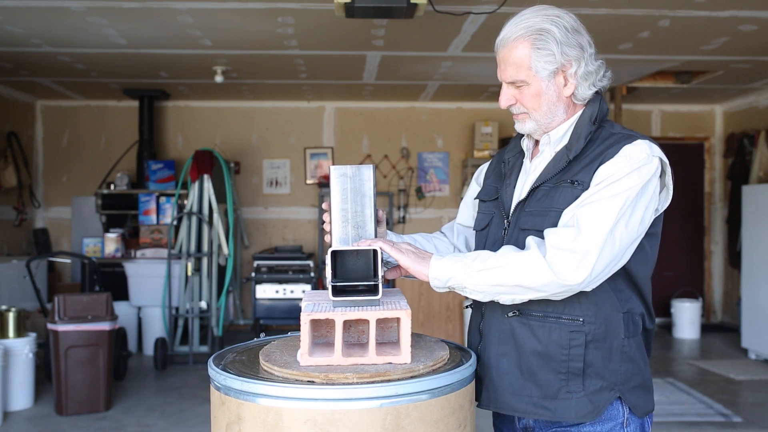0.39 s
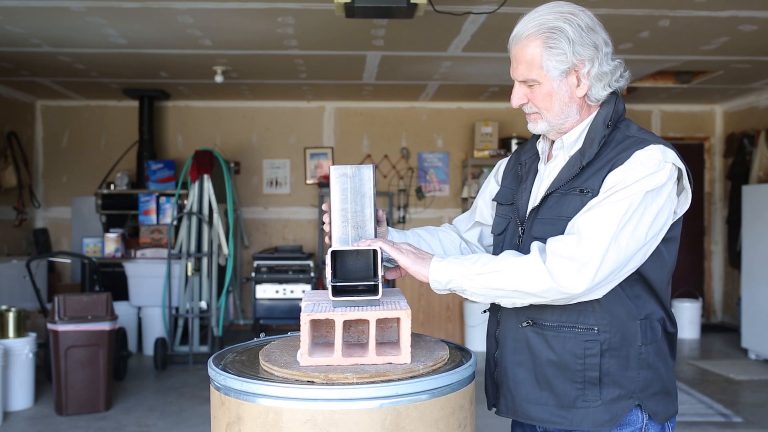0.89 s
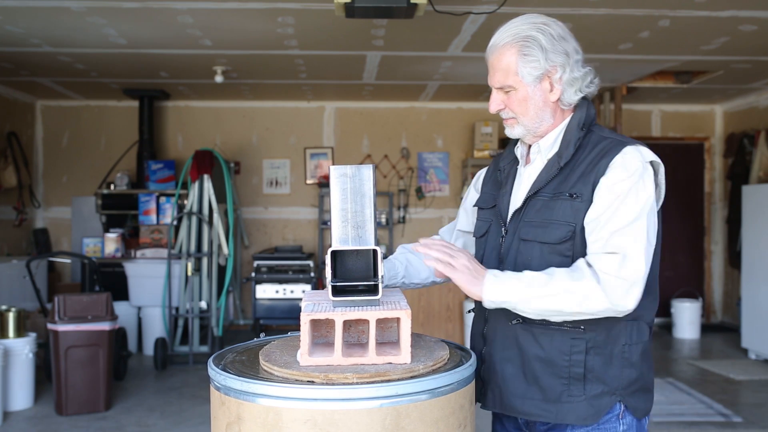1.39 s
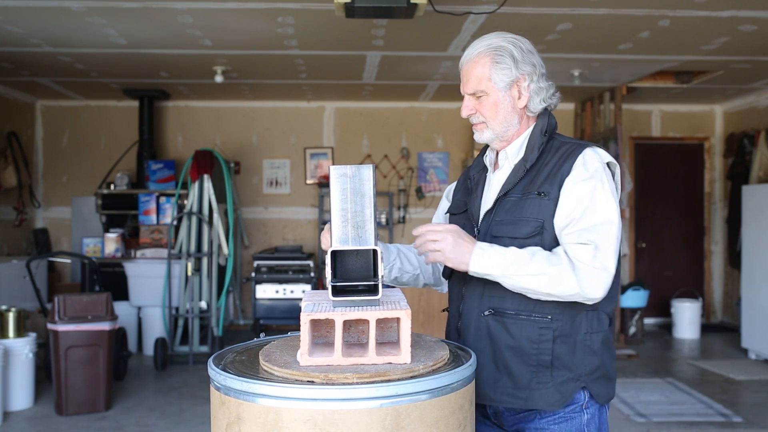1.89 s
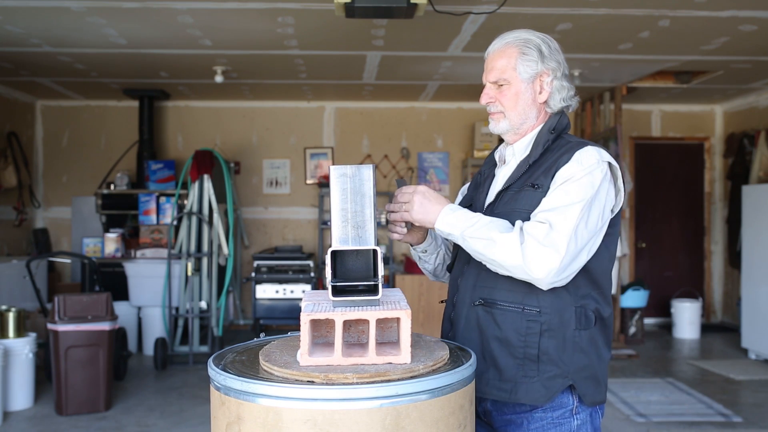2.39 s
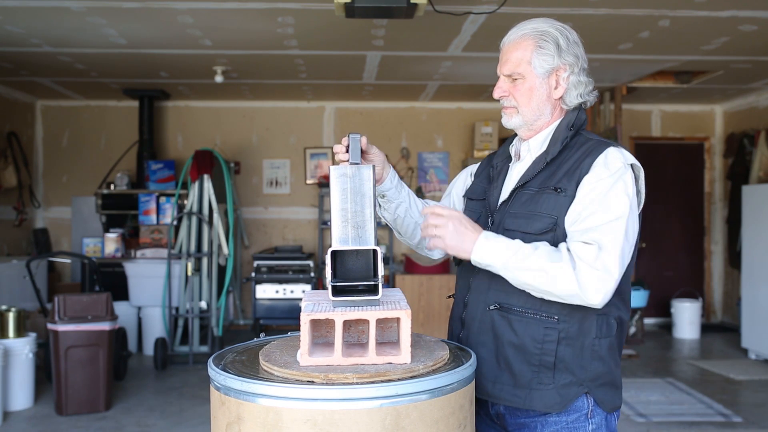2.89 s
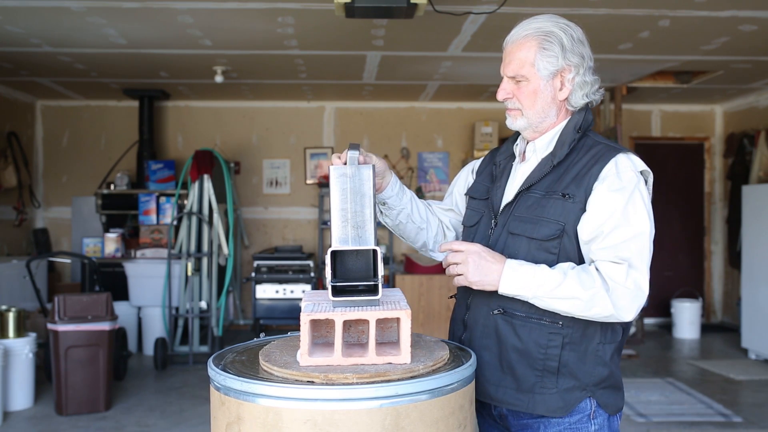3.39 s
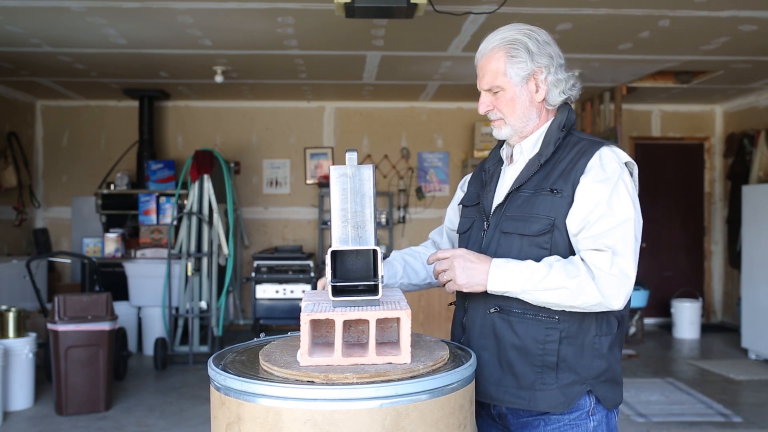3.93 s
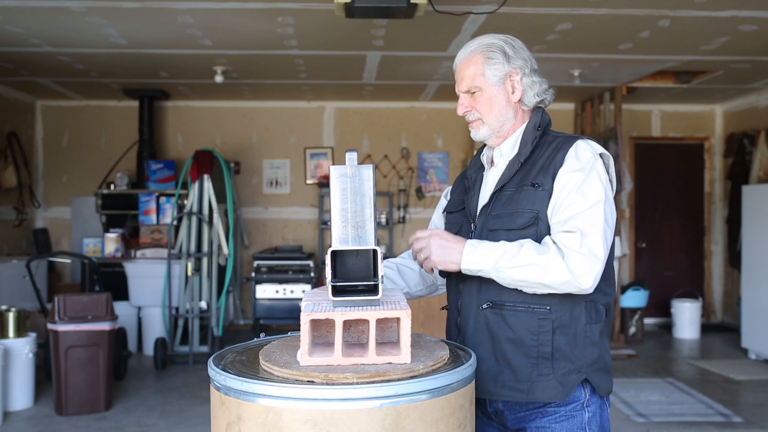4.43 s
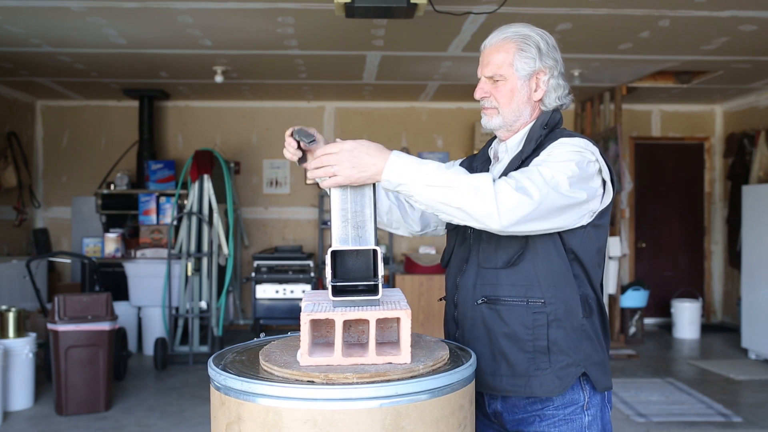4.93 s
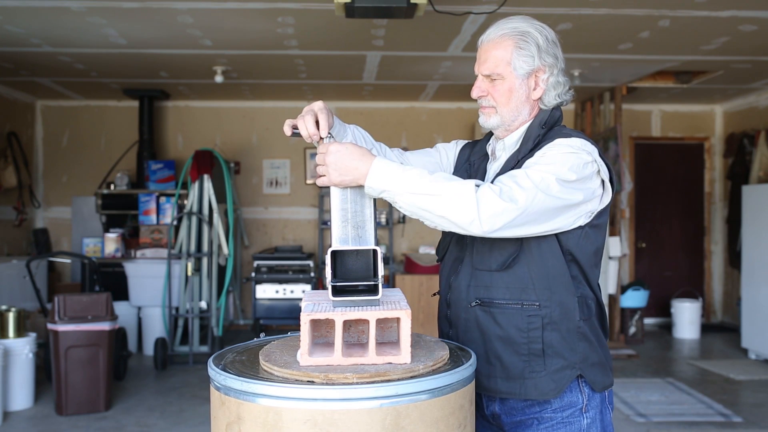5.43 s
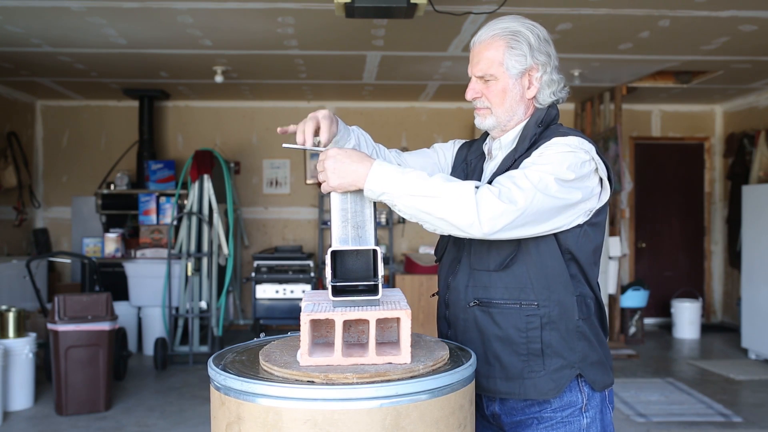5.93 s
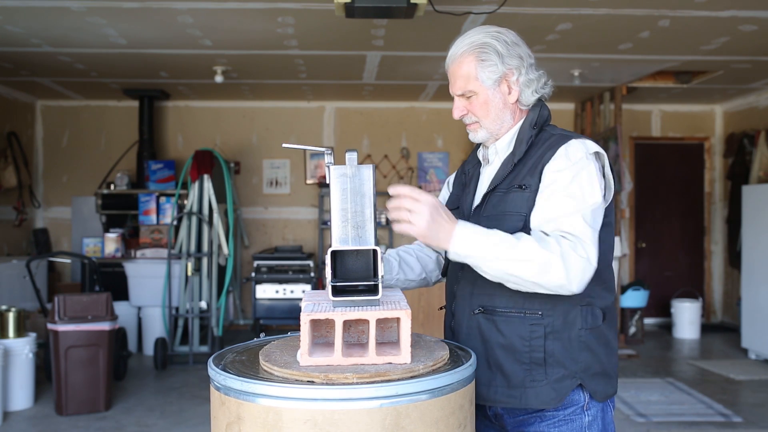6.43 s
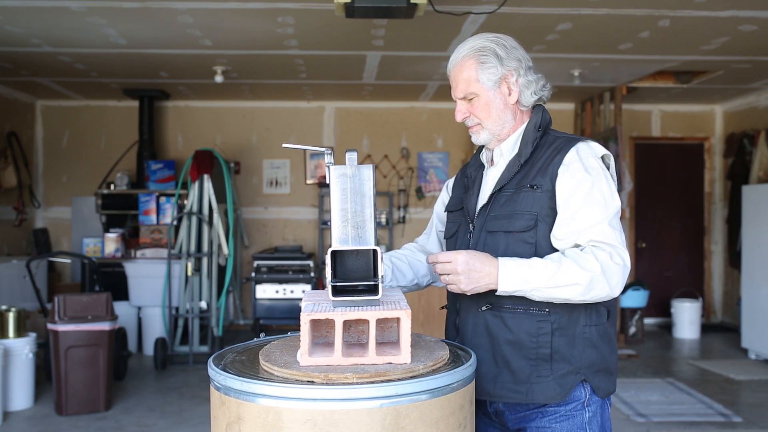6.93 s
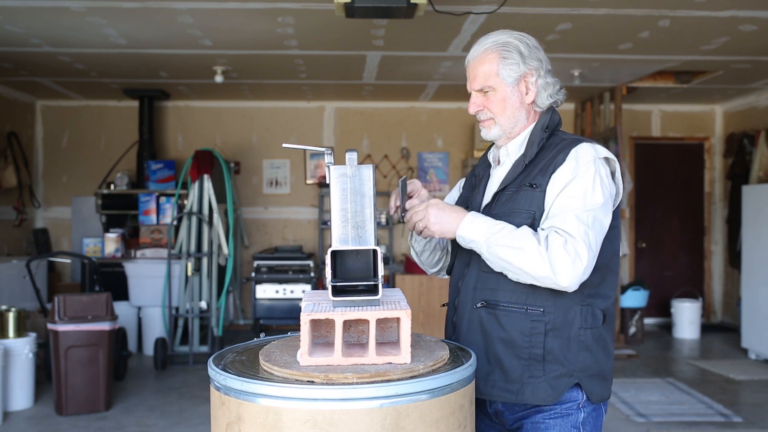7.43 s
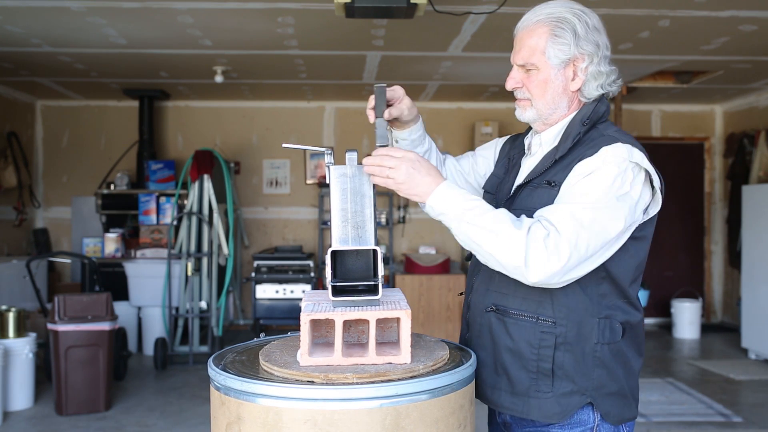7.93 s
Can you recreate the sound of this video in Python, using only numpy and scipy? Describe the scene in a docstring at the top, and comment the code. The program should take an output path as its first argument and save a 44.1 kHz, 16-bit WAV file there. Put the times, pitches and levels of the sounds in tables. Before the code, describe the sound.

In a quiet garage, stove parts are assembled by hand. Loud metallic scraping and clattering opens the scene and fades quickly. Small clinks and low drum knocks come next, then a burst of sharp bracket clanks, faint finger ticks and sleeve rustle, a rougher buzzing set of clanks, and a last clear ting with dull taps. Room tone and hiss dip after loud hits.

```python
"""Fitting steel stove parts in a garage

A chimney tube slides home, strips are picked off a drum top and dropped into slots, sleeves rustle.
Struck steel is a sum of dying modes plus a noise crack; sliding steel is rung by random catches.
Fingers, cloth and air are filtered noise. Sparse echoes prolong the metal and finger sounds,
and a gain control ducks everything, hiss included, after each clank."""
import sys
import numpy as np
from scipy import signal
from scipy.fft import rfft, irfft
from scipy.io import wavfile
from scipy.ndimage import uniform_filter1d

SR = 44100
rng = np.random.default_rng(int(sys.argv[2]) if len(sys.argv) > 2 else 0)


def decibels_to_gain(level_db):
    """Convert a level in decibels to a linear amplitude gain (20 dB per decade)."""
    exponent = np.asarray(level_db, float) / 20
    return 10 ** exponent


def wav_record(signal):
    """Record a signal, one row per channel, as 16-bit PCM in the file named by sys.argv[1]."""
    frames = np.transpose(np.atleast_2d(signal))
    bounded = np.clip(frames, -1, 1)
    # unit amplitude maps onto the largest positive 16-bit level
    quanta = np.round(bounded * 32767).astype(np.int16)
    wavfile.write(sys.argv[1], SR, quanta)


N = 355887  # length in samples

# Modes of each part: pitch_hz, relative_level_db, t60_s (when freedom is 1)
CHIMNEY_MODES = [(450, -7, .1), (520, -8, .1), (900, -13, .1), (1164, -11, .25), (1500, -8, .3),
                 (1850, -10, .15), (2148, -7, .2), (2220, -1, .15), (2300, -2, .18), (2500, -7, .15),
                 (2690, -6, .4), (2850, -3, .12), (2972, -7, .2), (3240, -12, .25), (3398, -9, .2),
                 (3600, -11, .15), (3730, -12, .25), (3890, -7, .2), (4200, -14, .2), (4475, -15, .25),
                 (4684, -17, .25), (5300, -21, .1), (6000, -20, .1), (7225, -21, .1), (8566, -24, .1),
                 (9826, -27, .1), (10890, -27, .1), (11370, -25, .1), (13220, -30, .08)]
FIRST_BRACKET_MODES = [(1150, -8, .12), (1188, -3, .12), (1523, -10, .12), (1624, -11, .12),
                       (1911, -17, .1), (2346, 0, .15), (2370, -8, .13), (2490, -15, .1), (2644, -18, .2),
                       (2913, -15, .15), (3118, -14, .15), (3400, -12, .12), (3720, -16, .12),
                       (4318, -18, .15), (4884, -21, .25), (5718, -27, .3), (5998, -25, .25),
                       (6950, -22, .1), (7500, -29, .15), (8592, -26, .12), (10890, -24, .12),
                       (13000, -34, .1)]
SECOND_BRACKET_MODES = [(760, -10, .2), (900, -7, .15), (1126, -4, .2), (1546, -5, .1), (1643, -.5, .12),
                        (1842, -8, .15), (2050, -8, .12), (2224, -8, .15), (2321, -3, .1), (2397, -4, .2),
                        (2725, -6, .15), (2967, -5, .12), (3118, -3, .12), (3300, -6, .12), (3489, -5, .15),
                        (3995, -10, .15), (4582, -13, .15), (5034, -18, .12), (5400, -18, .1),
                        (5987, -16, .1), (6450, -18, .1), (6900, -19, .1), (7263, -18, .1), (7700, -21, .1),
                        (8641, -20, .08), (9228, -20, .1), (10921, -25, .1)]
FIRST_STRIP_MODES = [(3085, 2, .55), (3108, -9, .5), (3779, -16, 3.5), (3795, -26, 2.), (4872, -12, .4),
                     (4900, -16, .4), (5120, -20, .3), (6573, -24, .25), (8463, -16, .4), (8592, -2, .3),
                     (8979, -11, .28), (11220, -8, .22), (11320, -12, .4)]
SECOND_STRIP_MODES = [(888, -7, .45), (2444, -6, .45), (3112, -5, .36), (3741, -13, .5), (5120, -10, .34),
                      (7246, -22, .26), (8462, 0, .45), (8877, -19, .28), (8990, -21, .5), (9228, -11, .5),
                      (10590, -15, .12), (11230, -8, .24)]
DRUM_MODES = [(86.6, 2, 0.14), (123, -18, 0.15), (175.2, -3.5, 0.31), (200.3, 2, 0.15), (261.5, -5.5, 0.21),
              (278, 3.5, 0.11), (372.6, 5, 0.071), (410.2, -10.5, 0.35), (462.4, -8.5, 0.22),
              (597, 5, 0.05), (688, -9.5, 0.127), (796, -3, 0.046), (1040, 13, 0.009)]

# Blows on each part: start_s, relative_level_db, hardness_db_per_octave, time_loose_s
CHIMNEY_BLOWS = [(.02, -13, -2.5, .012), (.052, -8, -10, 0.015), (.075, -4.5, -6.5, 0.0082),
                 (.098, 1, 4, 0.0089), (.109, -2, -3, .03), (.182, -1.5, 1.1, 0.016),
                 (.199, -3.5, 2.5, 0.046), (.3, -5, -7.5, 0.0026), (.63, -23.5, -15, 0.0047),
                 (.676, -19.5, -17, .035), (.719, -54, -10, 0.009), (.87, -31, -14.5, 0.009)]
FIRST_BRACKET_BLOWS = [(3.153, -1.5, .6, 0.021), (3.303, -0.5, 1, 0.026), (3.398, -7.5, -0.7, 0.048),
                       (3.474, -5.5, -1.5, 0.012), (3.51, 0, 0.6, 0.011), (3.563, -6.5, -1.6, 0.018),
                       (4.251, -29, -14, 0.025), (4.458, -23, -9, 0.075)]
SECOND_BRACKET_BLOWS = [(5.333, -12, -2.5, 0.085), (5.603, -17.5, -2.5, 0.016), (5.799, -8, -2, 0.026),
                        (5.848, -20.5, -1, 0.017), (5.912, -7.5, 2.5, 0.018), (6.013, -17, -0.3, 0.017)]
FIRST_STRIP_CLINKS = [(1.629, -19.5, -.3, .7), (1.6692, -27, .5, .7)]
SECOND_STRIP_CLINKS = [(7.061, -15, -.4, .3)]
DRUM_KNOCKS = [(.098, -17, -10, .015), (1.616, -26.5, -3.5, 0.039), (1.652, -19, -2, 0.047),
               (1.736, -30.5, 22, 0.018), (3.153, -15.5, -22, 0.019), (3.506, -12.5, -2, 0.045),
               (4.251, -27, 2, 0.079), (5.33, -19, -7.2, .05), (5.796, -22, -8, .05),
               (5.911, -10.5, 2, .042), (6.578, -23.5, -4.5, .04), (6.606, -28, -1.5, 0.034),
               (6.655, -23.5, -3, 0.045), (6.945, -25, 2, .02), (6.958, -22.5, 2, .05),
               (7.062, -17.5, 2, 0.036), (7.634, -17.5, -5.5, .017)]

# Steel sliding on steel or dragging over the drum: peak_s, relative_level_db, rise_s, fall_s
CHIMNEY_SLIDES = [(0.101, -17.5, 0.3, 0.39), (.23, -24.5, .1, 0.38)]
FIRST_BRACKET_SLIDES = [(3.392, -30.5, .05, 0.29), (3.508, -25.5, 0.2, 0.16), (4.242, -46, 0.0038, 0.1),
                        (4.47, -36.5, 0.071, 0.05)]
SECOND_BRACKET_SLIDES = [(5.56, -40, .15, 0.64), (5.74, -39, 0.063, 0.37), (5.84, -28.5, 0.14, 0.26),
                         (5.944, -25, 0.12, 0.17)]
DRUM_DRAGS = [(.058, -12.5, 0.45, 0.13), (.1, -7.5, 0.12, 0.016), (.61, -49, 0.011, 0.22),
              (.68, -28.5, 0.0087, 0.076), (.95, -49.5, 1, 0.11), (1.668, -28, 0.11, 0.37),
              (3.162, -26.5, 0.0035, 0.07), (3.267, -30.5, .02, 0.43), (3.51, -26.5, 0.35, 0.21),
              (4.124, -46, .04, 0.16), (4.271, -43.5, 0.023, 0.79), (4.42, -37, .02, 0.38),
              (5.339, -24, 0.007, 0.19), (5.621, -34.5, 0.36, 0.2), (5.804, -24.5, 0.047, 0.25),
              (5.908, -36, 0.041, 0.81), (6.58, -50, .15, 1), (6.957, -24, .045, 0.28),
              (7.068, -30, .005, .07), (7.636, -40, 0.012, 0.058)]

# Fingers brushing and ticking on metal: start_s, relative_level_db, length_s, brightness_db_per_octave
FINGER_TOUCHES = [(1.271, -38.5, 0.035, -0.8), (1.304, -41, 0.015, 1.5), (1.374, -44.5, 0.049, -2.5),
                  (2.324, -36, 0.0017, -3.5), (2.771, -42, 0.0049, -1), (4.247, -27, 0.011, -1.5),
                  (4.414, -25.5, 0.0036, -7.5), (4.424, -28.5, 0.023, -9), (4.449, -27, 0.035, -4.5),
                  (4.482, -23, 0.0079, -5.5), (5.044, -33, 0.0033, -5), (6.813, -45, 0.023, 1),
                  (6.84, -54, 0.0093, 4), (6.949, -27.5, 0.018, -2), (7.637, -20, 0.0041, -5.5),
                  (7.655, -30.5, 0.0038, 0.5), (7.678, -29, 0.0057, -2), (7.956, -45, 0.053, 1.5)]
# Reaches of the arm: fastest_moment_s, relative_level_db, rise_s, fall_s
ARM_REACHES = [(1.05, -54.5, 0.34, 0.33), (1.47, -56, 0.16, 0.97), (1.9, -51.5, 0.59, 1.7),
               (2.75, -55.5, 0.63, 4.1), (4.44, -55, 3.8, 0.86), (5.03, -49, 0.79, 0.47),
               (6.2, -53, 0.29, 2.3), (6.55, -53, 3.5, 0.6), (7.08, -49.5, 0.055, 2.5),
               (8.06, -47, 0.63, .5)]

# Spectrum of rubbing cloth and brushing fingers: frequency_hz, relative_level_db (per Hz)
CLOTH_SPECTRUM = [(88, -34), (150, 0), (225, -3), (262, -3.5), (525, -6.5), (714, -2), (954, -4.5),
                  (3470, -6), (15000, -25.5)]
# Spectrum of the contact noise of steel: frequency_hz, relative_level_db
CRACK_SPECTRUM = [(200, 6.5), (700, -10.5), (1500, 8), (3000, 4), (5000, -6.5), (9000, -18.5),
                  (15000, -29.5)]
# Spectrum of room tone and microphone hiss: frequency_hz, relative_level_db (per Hz)
AIR_SPECTRUM = [(12, -36), (20, -1.5), (101, -2), (293, -1.5), (472, -6.5), (527, -11), (698, -7),
                (1220, -3), (1370, -8.5), (3440, -15.5), (5080, -21.5), (14700, -19.5), (16000, -30)]
# Faint hums: pitch_hz, mean_level_db
HUM_TONES = [(92, -58), (531, -60.5)]
# Difference between the channels, relative to the air: frequency_hz, relative_level_db
SIDE_SPECTRUM = [(30, -37), (100, -18), (600, -23.5), (3000, -9), (6000, 0.5), (10000, -3.5), (15000, -2)]
# Decay of the room: frequency_hz, t60_s
GARAGE_DECAY = [(100, 0.58), (300, 0.53), (1000, 0.44), (3000, 0.42), (6000, 0.46), (12000, 0.24)]

AIR_DB = -56.5  # rms level of the air
LOW_CUT_HZ = 135
MUFFLED = 0.15  # share of the ring left once a part has settled
CRACK_PER_HARDNESS = 0.33  # a harder blow cracks louder: dB for each dB per octave
STROKE_DB = 30  # how far a stroke climbs in its rise and sinks in its fall


def evened(x):
    """Normalisation: equal mean power, so that rms is 1."""
    return x / np.sqrt(np.mean(x ** 2) + 1e-20)


def read(points, hz):
    """Interpolation of a table along a logarithmic frequency axis."""
    table_hz, value = np.transpose(points)
    return np.interp(np.log(hz + 1), np.log(table_hz + 1), value)


def coloured(x, points, tilt_db=0):
    """Linear filtering: a spectrum is multiplied by a table and by a slope in dB per octave."""
    hz = np.fft.rfftfreq(len(x), 1 / SR)
    slope_db = tilt_db * np.log2(hz / 2000 + 0.051)
    return irfft(rfft(x) * decibels_to_gain(read(points, hz) + slope_db), len(x))


def add(mix, start_s, sound):
    """Superposition: pressures add from the starting time onwards."""
    part = mix[round(start_s * SR):][:len(sound)]
    part += sound[:len(part)]


def stroke_gain(strokes):
    """Incoherent addition: strokes swell and sink evenly in dB, and overlaps add in power."""
    t = np.arange(0, N + 32, 32) / SR
    power = 0
    for peak_s, level_db, rise_s, fall_s in strokes:
        away = np.where(t < peak_s, (peak_s - t) / rise_s, (t - peak_s) / fall_s)
        power = power + decibels_to_gain(level_db - STROKE_DB * away) ** 2
    return np.interp(np.arange(N) / SR, t, np.sqrt(power))


def air():
    """Stationary noise: room tone and microphone hiss, with faint hums wavering in level and phase."""
    t = np.arange(N) / SR
    out = decibels_to_gain(AIR_DB) * evened(coloured(rng.standard_normal(N), AIR_SPECTRUM))
    for pitch_hz, level_db in HUM_TONES:
        waver = evened(uniform_filter1d(rng.standard_normal(N), 8000))
        out = out + decibels_to_gain(level_db + 0.9 * waver) * np.sin(2 * np.pi * pitch_hz * t + 3.7 * waver)
    return out


def side_hiss():
    """Decorrelation: independent hiss, opposite in sign in the two channels, makes them differ."""
    hiss = evened(coloured(rng.standard_normal(N), AIR_SPECTRUM))
    side = decibels_to_gain(AIR_DB) * coloured(hiss, SIDE_SPECTRUM)
    return np.array([side, -side])


def garage(x):
    """Reverberation: sparse echoes of random sign, each band dying at its own speed."""
    taps = np.zeros(SR)
    at = np.arange(300, SR - 20, 20)
    taps[at + rng.integers(0, 20, len(at))] = rng.choice([-1., 1.], len(at))
    hz, t, bands = signal.stft(taps, SR, nperseg=256)
    decay = decibels_to_gain(-60 * t / read(GARAGE_DECAY, hz)[:, None])
    tail = signal.istft(bands * decay, SR, nperseg=256)[1]
    return signal.fftconvolve(x, tail / np.linalg.norm(tail))[:N]


def sleeves():
    """Friction noise: cloth rubs on cloth, its dense fibres slipping in loose clumps."""
    clumps = evened(uniform_filter1d(rng.standard_normal(N), 1500))
    fibres = rng.standard_normal(N) * decibels_to_gain(1.34 * clumps)
    return evened(coloured(fibres, CLOTH_SPECTRUM)) * stroke_gain(ARM_REACHES)


def touches():
    """Brief friction: fingers on metal give short puffs of noise that start fast and fade."""
    out = np.zeros(N)
    t = np.arange(4096) / SR
    for start_s, level_db, length_s, bright_db in FINGER_TOUCHES:
        u = t / length_s
        puff = evened(coloured(rng.standard_normal(len(t)), CLOTH_SPECTRUM, bright_db + 1.0))
        envelope = (1 - np.exp(-8 * u)) * np.exp(-u ** 0.7)
        add(out, start_s, decibels_to_gain(level_db - 2.5) * puff * envelope)
    return out


def ring(modes, hardness_db, freedom):
    """Modal decay: a hard blow favours the high modes, and a grip (low freedom) shortens them all."""
    hz, level_db, t60_s = np.transpose(modes)[:, :, None]
    t = np.arange(SR * 4 // 5) / SR
    tilt_db = hardness_db * np.log2(hz / np.median(hz))
    gain = decibels_to_gain(level_db + tilt_db - 60 * t / (t60_s * freedom))
    phase = np.arange(len(modes))[:, None] % 3 * 2 * np.pi / 3  # three phases in turn
    tone = (gain * np.sin(2 * np.pi * hz * t + phase)).sum(0)
    return tone * (1 - t / t[-1]) * (1 - np.exp(-t / 0.00008))


def slides(modes, strokes, catches_per_s, uneven_db, freedom, grit_db):
    """Random excitation: burrs catch and ring the damped part; as contact wanders, mode groups swell."""
    catches = (rng.random(N) < catches_per_s / SR) * rng.standard_normal(N)
    catches = evened(catches * decibels_to_gain(uneven_db * np.minimum(rng.exponential(1, N), 4)))
    gain = stroke_gain(strokes)
    whole = np.linalg.norm(ring(modes, 0, freedom))
    out = decibels_to_gain(grit_db) * evened(coloured(catches, CRACK_SPECTRUM)) * gain
    for first in range(3):  # every third mode forms a group
        wander = evened(uniform_filter1d(uniform_filter1d(rng.standard_normal(N), 2000), 2000))
        body = ring(modes[first::3], 0, freedom) / whole
        out += signal.oaconvolve(catches * gain * decibels_to_gain(3 * wander), body)[:N]
    return out


def blows(modes, rows, freedom, crack_db, buzz=0.58):
    """Impact: a blow rings the part and cracks; it chatters loose, then settles and is muffled."""
    out = np.zeros(N)
    for start_s, level_db, hardness_db, loose_s in rows:
        rung = ring(modes, hardness_db, freedom)
        t = np.arange(len(rung)) / SR
        shake = evened(uniform_filter1d(rng.standard_normal(len(rung)), 120))
        rung = rung * (1 + buzz * shake)  # a part in a slot buzzes against its neighbour
        loose = 1 / (1 + (t / loose_s) ** 6)
        damping = MUFFLED + (1 - MUFFLED) * loose
        add(out, start_s, decibels_to_gain(level_db - 9) * rung / np.std(rung[:900]) * damping)

        t, loose = t[:4096], loose[:4096]
        crack = evened(coloured(rng.standard_normal(4096), CRACK_SPECTRUM, hardness_db))
        crack = crack * (1 - np.exp(-t / 0.0001))
        rattle = 0.22 * loose * np.exp(-t / 0.1)
        sharp_db = level_db + crack_db + CRACK_PER_HARDNESS * hardness_db
        add(out, start_s, decibels_to_gain(sharp_db) * crack * (np.exp(-t / 0.0021) + rattle))
    return out


def scene():
    """Superposition at one point: all parts in the room, through a microphone weak in the deep bass."""
    steel = touches()
    steel += slides(DRUM_MODES, DRUM_DRAGS, 500, 1.2, freedom=0.65, grit_db=-22)
    steel += slides(CHIMNEY_MODES, CHIMNEY_SLIDES, 1300, 3, freedom=0.18, grit_db=-3)
    steel += slides(FIRST_BRACKET_MODES, FIRST_BRACKET_SLIDES, 1500, 2, freedom=0.2, grit_db=-4)
    steel += slides(SECOND_BRACKET_MODES, SECOND_BRACKET_SLIDES, 2500, 1.5, freedom=0.2, grit_db=-5)
    steel += blows(DRUM_MODES, DRUM_KNOCKS, freedom=0.65, crack_db=-28, buzz=0)
    steel += blows(CHIMNEY_MODES, CHIMNEY_BLOWS, freedom=0.58, crack_db=-3)
    steel += blows(FIRST_STRIP_MODES, FIRST_STRIP_CLINKS, freedom=1.05, crack_db=-10, buzz=0.12)
    steel += blows(FIRST_BRACKET_MODES, FIRST_BRACKET_BLOWS, freedom=1.46, crack_db=-4.5, buzz=0.16)
    steel += blows(SECOND_BRACKET_MODES, SECOND_BRACKET_BLOWS, freedom=1, crack_db=0)
    steel += blows(SECOND_STRIP_MODES, SECOND_STRIP_CLINKS, freedom=1, crack_db=-3, buzz=0)
    low_cut = signal.butter(4, LOW_CUT_HZ, "high", fs=SR, output="sos")
    in_room = steel + decibels_to_gain(-7.5) * garage(steel) + sleeves()
    mid = signal.sosfilt(low_cut, in_room) + air()
    return np.array([mid, mid])


def low_pass(x):
    """Removes everything above the highest recorded frequency."""
    return signal.sosfilt(signal.butter(12, 16490, fs=SR, output="sos"), x)


def record(dry):
    """Compression: gain falls within hundredths of a second, recovers slowly; loud peaks clip softly."""
    power_db = 10 * np.log10(signal.lfilter([0.004], [1, -0.996], dry[0] ** 2) + 1e-12)
    fall_db = np.arange(N) * 26 / SR  # the held level sinks by 26 dB a second
    held_db = np.maximum.accumulate(power_db + fall_db) - fall_db
    over_db = np.maximum(held_db + 33, 0)  # threshold at -33 dB
    keep = np.exp(-1 / (0.0096 * SR))  # smoothing over 9.6 ms
    cut_db = 0.34 * signal.lfilter([1 - keep], [1, -keep], over_db)
    ducked = (dry + side_hiss()) / decibels_to_gain(cut_db)
    mix = 0.88 * np.tanh(ducked / 0.77)
    return low_pass(mix)


dry = scene()
out = record(dry)
wav_record(out)
```